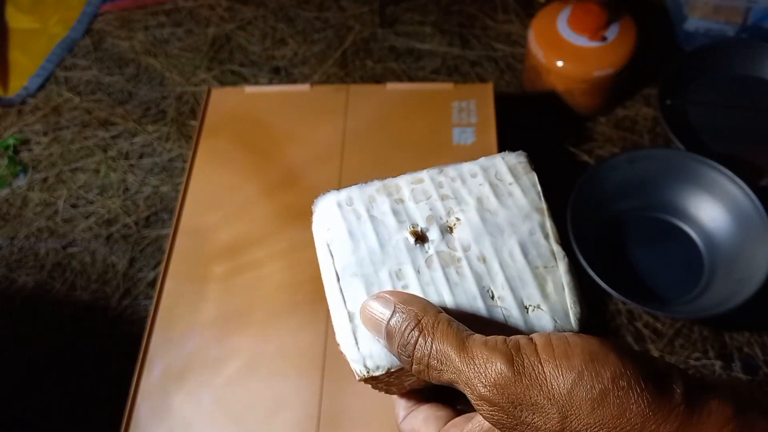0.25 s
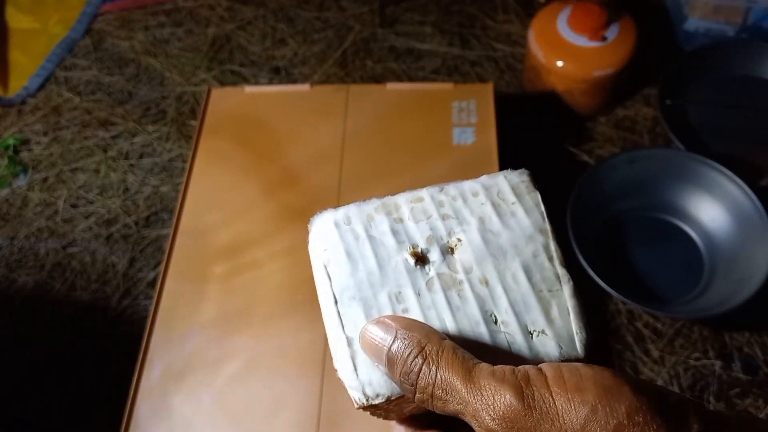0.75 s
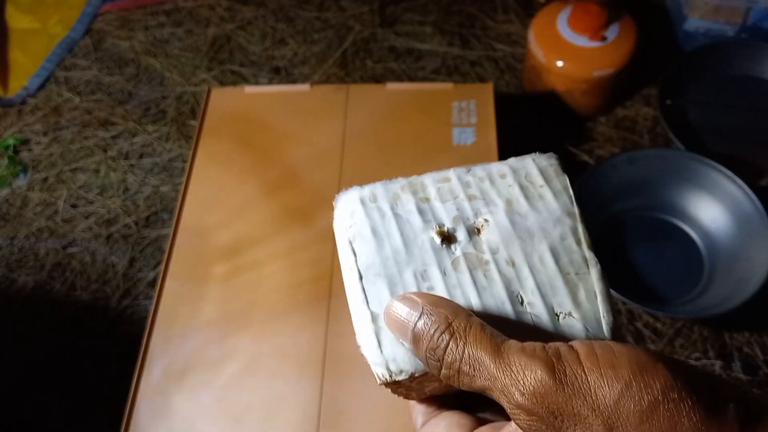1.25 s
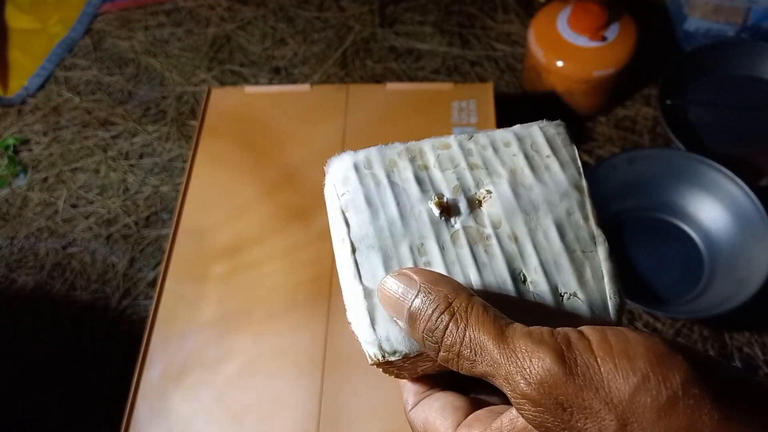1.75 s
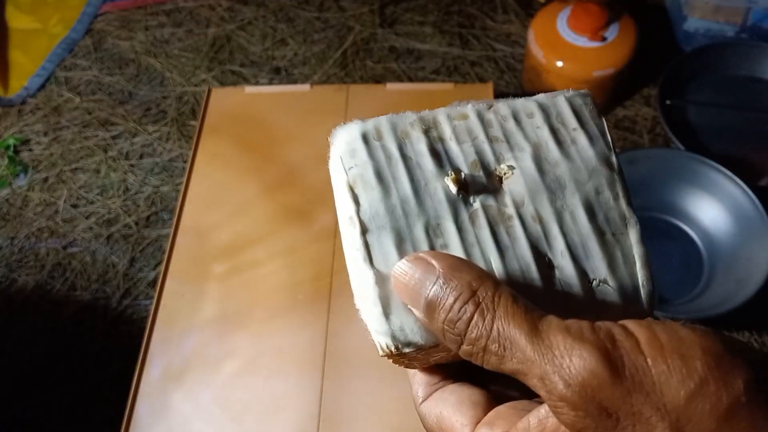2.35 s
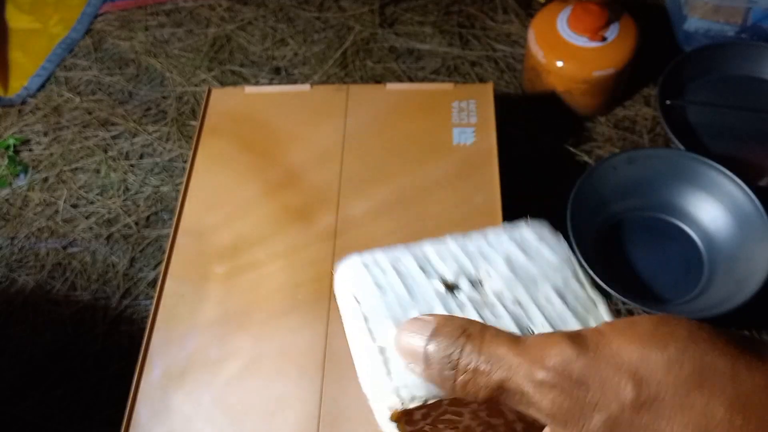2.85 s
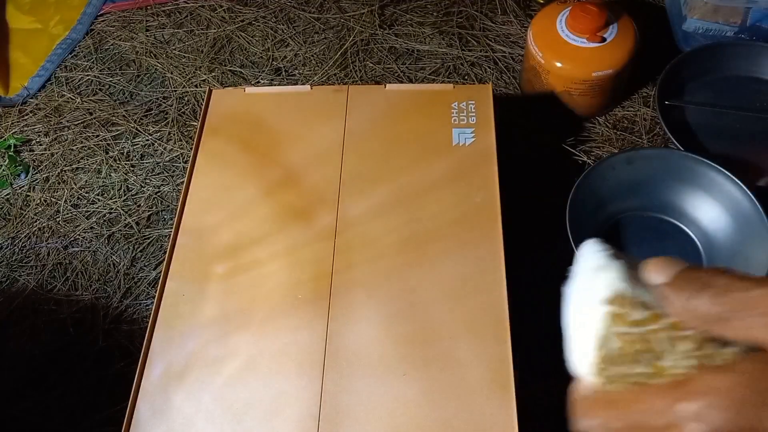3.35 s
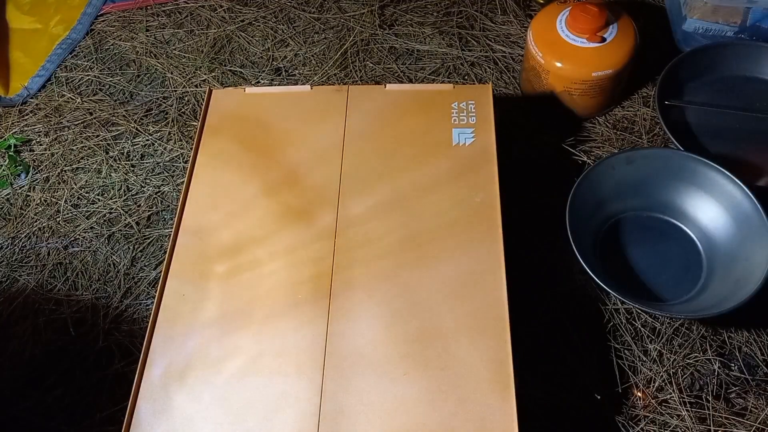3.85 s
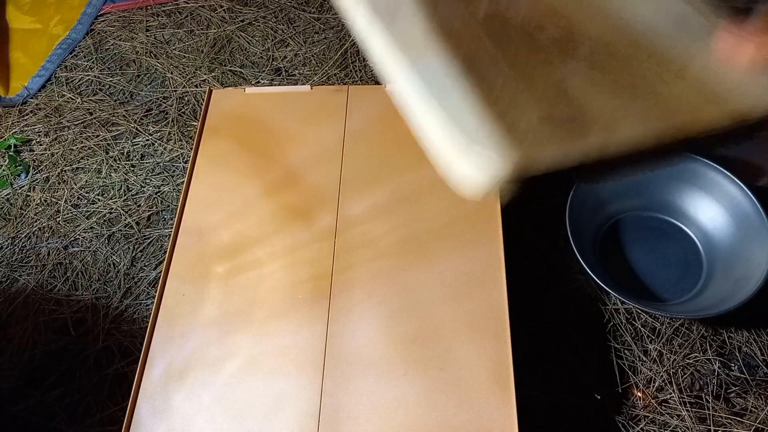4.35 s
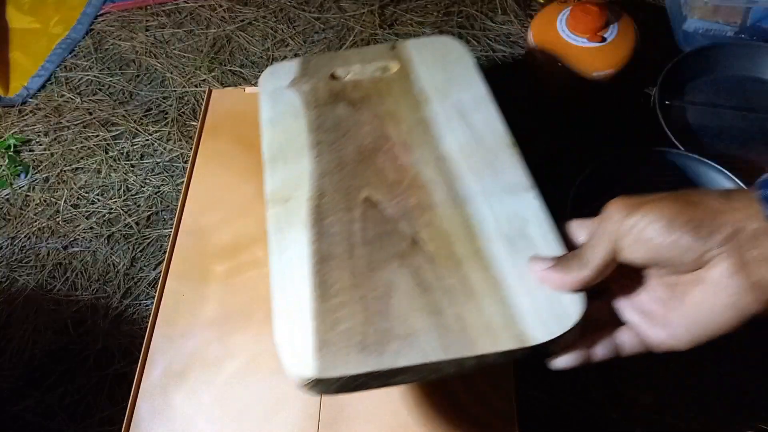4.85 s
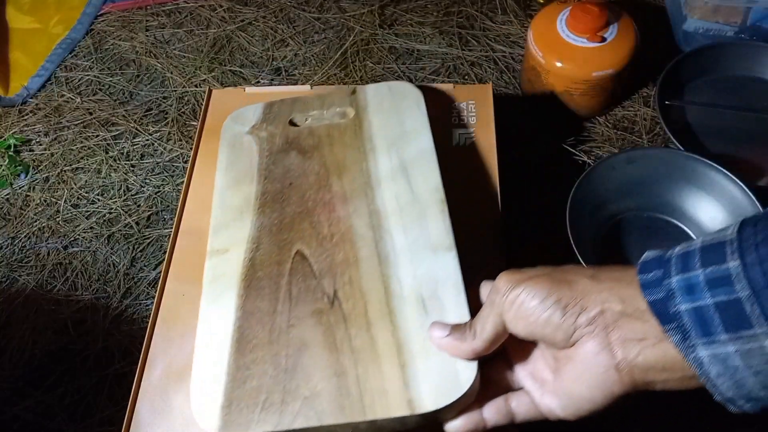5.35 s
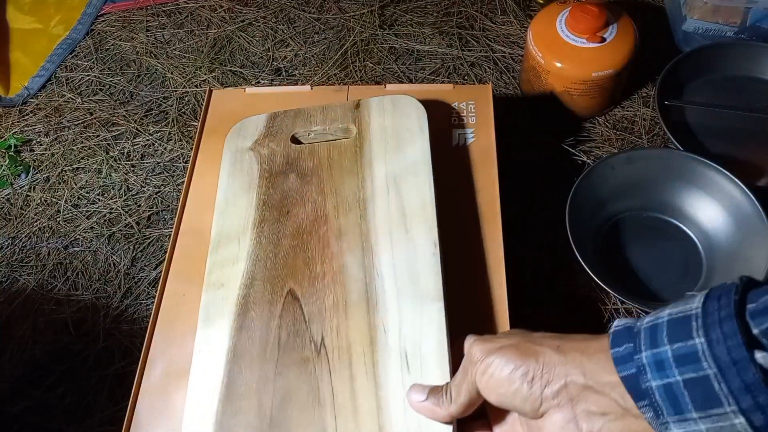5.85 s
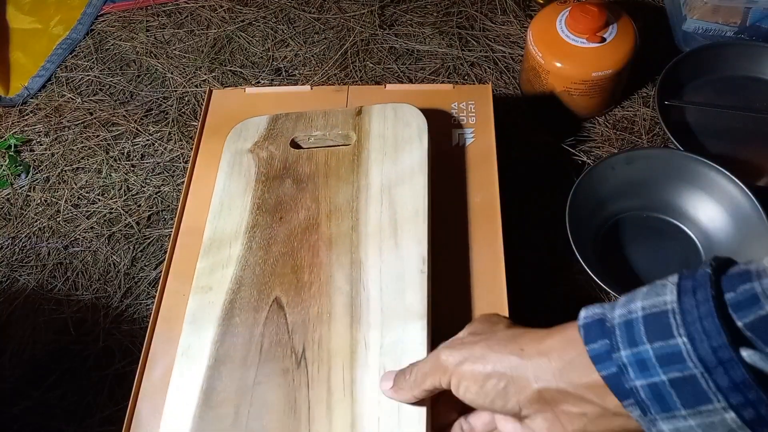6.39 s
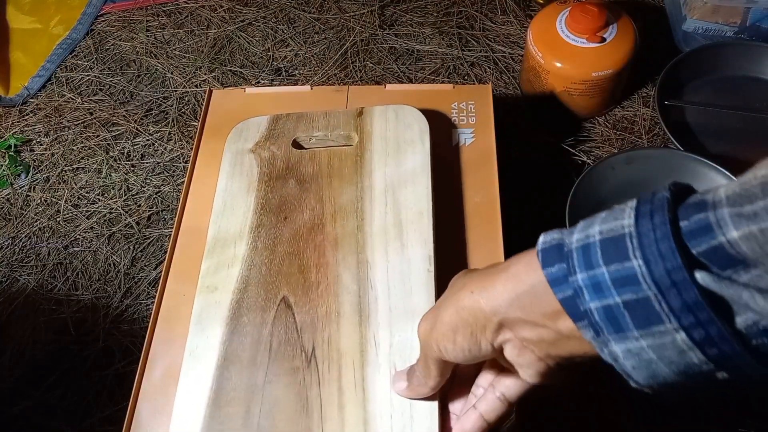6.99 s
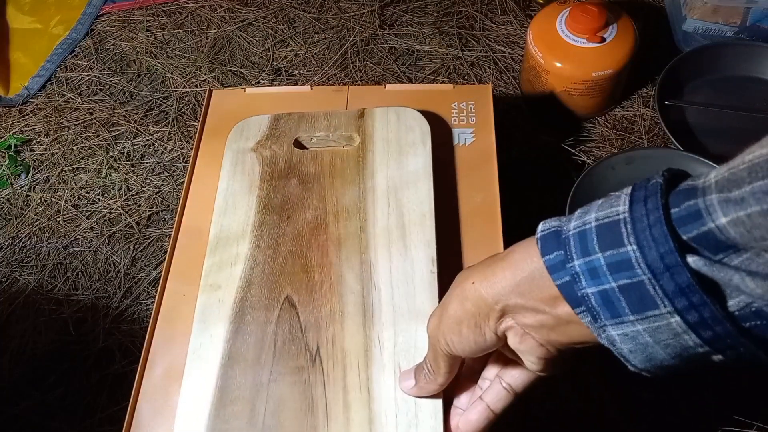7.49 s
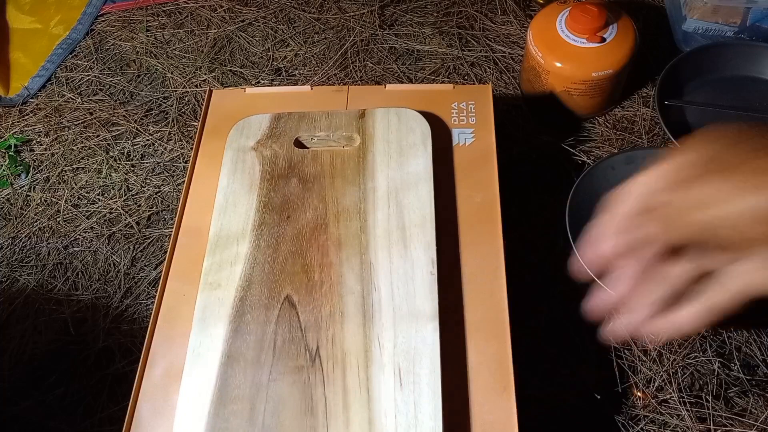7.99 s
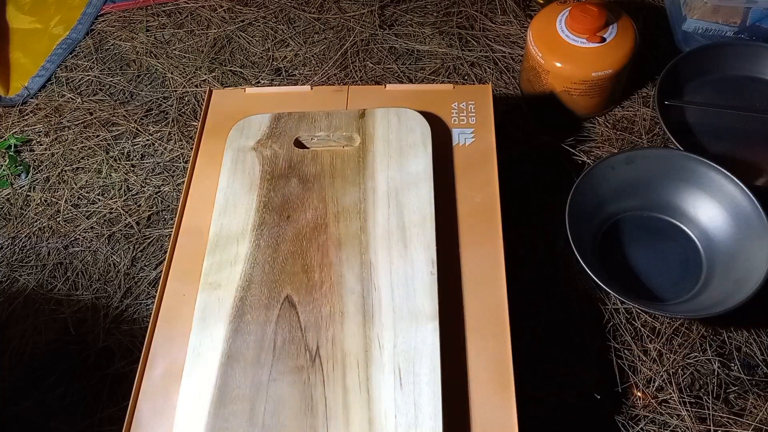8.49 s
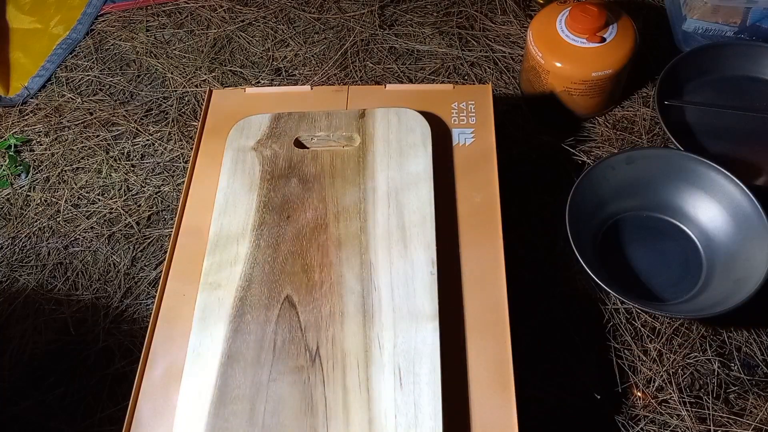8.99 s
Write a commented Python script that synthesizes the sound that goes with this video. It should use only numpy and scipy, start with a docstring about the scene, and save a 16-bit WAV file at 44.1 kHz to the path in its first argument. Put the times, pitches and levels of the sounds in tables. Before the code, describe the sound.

Crickets chirp throughout in a forest at night, a fast, very high trill alongside lower, slower chirps, over a steady low rumble. One nearer cricket stands out from about 0.7 to 1.7 seconds and again from 7 to 8. Close to the microphone, a metal pot is grazed at 0.3 seconds and clanks sharply at 0.6, ringing briefly. From 1 to 4 seconds, a block of food is turned in the hand with dull bumps and soft sleeve rustles, with another light pot touch at 1.8. A very faint, thin whistle rises and falls just after 4 seconds. A wooden board knocks onto a folding table at 5.4, clicks at 5.6 and clacks down louder at 6.3, with soft scrapes as it is nudged into place. Light rustles and a small metallic tick come between 8 and 8.5 seconds, and one more faint rustle at 9.

```python
"""Crickets, low-voiced and high-voiced, chirp at a forest camp at night by stridulation: a scraper
runs along a file and drives a wing resonance. Behind them lie a low rumble and a far insect chorus.
Close by, friction and soft impacts sound as sleeves move and a block of food is turned in the hand.
Struck metal cookware rings in damped modes, a faint whistle arches up and down, and a wooden board
clatters onto a folding table and slides. Ground and trunks scatter a short reverberant tail."""
import sys
import numpy as np
from scipy import signal
from scipy.fft import rfft, irfft, next_fast_len
from scipy.io import wavfile
from scipy.ndimage import map_coordinates

SR = 44100
rng = np.random.default_rng(int(sys.argv[2]) if len(sys.argv) > 2 else 0)


def materialize(psi):
    """Save the field psi as 16-bit PCM at rate SR to the path in sys.argv[1].

    A 1-D psi becomes a single channel; in a 2-D psi each row is a channel.
    """
    bounded = np.clip(np.atleast_2d(psi).T, -1, 1)
    quanta = np.round(bounded * 32767).astype(np.int16)
    wavfile.write(sys.argv[1], SR, quanta)


N = 407043


def amp(db):
    """Amplitude ratio of a level in decibels."""
    return 10 ** (np.asarray(db) / 20)


def unit(x):
    """Normalisation to rms 1."""
    return x / np.sqrt(np.mean(x ** 2) + 1e-20)


def clock(seconds):
    """Uniform sampling times over a duration."""
    return np.arange(int(seconds * SR)) / SR


def along(points, hz):
    """Interpolation of (f/Hz, value) points on a logarithmic frequency axis."""
    f, value = np.transpose(points)
    return np.interp(np.log(hz + 1), np.log(f + 1), value)


def wobble(rate):
    """Random modulation: a spline through Gaussian knots, rate of them a second."""
    knots = rng.standard_normal(int(N * rate / SR) + 4)
    return map_coordinates(knots, [np.arange(N) * rate / SR])


def filtered(x, response):
    """Linear filtering: the spectrum is multiplied by a frequency response."""
    n = x.shape[-1]
    padded = next_fast_len(n + 8192)
    return irfft(rfft(x, padded) * response(np.fft.rfftfreq(padded, 1 / SR)), padded)[..., :n]


def add(track, s, sound):
    """Superposition of a sound on a track, starting at time s."""
    i = max(round(s * SR), 0)
    part = track[..., i:i + sound.shape[-1]]
    part += sound[..., :part.shape[-1]]


def place(x, lead_ms, pan_db):
    """Localisation by time and level differences; positive values favour the left."""
    sides = np.array([[.5], [-.5]])
    return amp(sides * pan_db) * filtered(x, lambda hz: np.exp(2j * np.pi * hz * sides * lead_ms / 1000))


# left-right coherence of the sound field: f/Hz, coherence
COHERENCE = [(30, 0.57), (100, 1), (250, 0.86), (600, 0.19), (1500, 0), (4000, 0)]
def noise(spectrum, size=N):
    """Diffuse field: coloured stereo noise of rms 1, coherent in the bass, incoherent in the treble."""
    def response(hz):
        angle = np.arccos(np.clip(along(COHERENCE, hz), -1, 1)) / 2
        return amp(along(spectrum, hz)) * [np.cos(angle), np.sin(angle)]
    mid, side = filtered(rng.standard_normal((2, size)), response)
    return unit(np.array([mid + side, mid - side]))


# reverberation time among the trees: f/Hz, T60/s
FOREST_T60 = [(200, 0.14), (2000, 0.24), (6000, 0.33), (14000, 0.02)]
def scattered(x, wet_db):
    """Scattering by ground and trunks adds a short diffuse tail, which drifts with the air."""
    hz, t, spectra = signal.stft(rng.standard_normal((2, 2, SR // 3)), SR, nperseg=256)
    decay = amp(-60 * t / along(FOREST_T60, hz)[:, None])
    tails = signal.istft(spectra * decay, SR, nperseg=256)[1]
    tails /= np.linalg.norm(tails, axis=-1, keepdims=True)
    wet_a, wet_b = signal.fftconvolve(x[None], tails, axes=-1)[..., :N]
    drift = 2 * wobble(2)
    return x + amp(wet_db) * (wet_a * np.cos(drift) + wet_b * np.sin(drift))


# spectra of the distant rumble and of far insects and air: f/Hz, relative level/dB
RUMBLE_SPECTRUM = [(15, -58), (25, -31), (37, -35), (50, -20.5), (75, -5), (123, 1.5), (171, -6),
                   (238, -5.5), (275, -11.5), (501, -20), (591, -24.5), (1170, -32.5), (1380, -36.5),
                   (1500, -31), (3500, -50.5), (4550, -66), (7700, -120)]
CHORUS_SPECTRUM = [(2000, -20), (3000, -18), (3600, -20), (4300, -1.5), (4700, -9.5), (5100, -12),
                   (5800, -22.5), (6350, -7.5), (7600, -13.5), (8600, -7.5), (10300, -20.5), (13500, -17.5),
                   (16000, -16)]
def forest():
    """Incoherent summation: many distant insects blur into noise above a steady rumble."""
    rumble = amp(-51.5 + .28 * wobble(16)) * noise(RUMBLE_SPECTRUM)
    chorus = amp(-68.5 + 1.8 * wobble(42)) * noise(CHORUS_SPECTRUM)
    return place(rumble + chorus, lead_ms=0, pan_db=-.7)


def burst(spectrum, t60):
    """Impact transient: dense modes act as noise that falls 60 dB in t60 seconds."""
    t = clock(.5)
    attack = 1 - np.exp(-t / .0016)
    return noise(spectrum, size=len(t)) * amp(-60 * t / t60) * attack


def movement(s, length, rise_s, fall_s):
    """Friction envelope: speed grows exponentially up to time s, holds, then dies away."""
    t = np.arange(N) / SR
    return np.exp(np.minimum(t - s, 0) / rise_s - np.maximum(t - s - length, 0) / fall_s)


# dull bumps, bright snags of skin and cloth, dry ticks: t/s, level/dB
BUMPS = [(1.183, -32.5), (1.34, -45), (2.135, -46), (2.251, -35), (2.265, -56), (2.322, -44.5),
         (2.586, -43), (2.764, -36.5), (2.776, -43.5), (3.591, -37.5)]
SNAGS = [(.234, -65.5), (.446, -68), (.548, -52.5), (1.757, -42.5), (1.83, -49), (3.705, -54),
         (8.188, -53.5), (8.25, -50), (8.275, -53.5), (8.347, -47), (8.392, -53.5), (8.412, -54.5),
         (9.07, -55)]
TICKS = [(2.267, -48.5), (5.6235, -30.5), (5.628, -32), (8.343, -38.5)]
# hand and sleeve movements: t/s, duration/s, brush level/dB, rub level/dB, swish level/dB
GESTURES = [(0, 0.072, -58.5, -70, -67), (.15, 0.2, -67, -76, -86), (1.175, 0.16, -63, -68.5, -71),
            (1.386, 0.4, -71.5, -85, -83), (1.771, 0.095, -64.5, -62.5, -59.5),
            (2.147, 0.17, -57, -63.5, -62), (2.385, 0.31, -66, -72, -70.5),
            (2.81, 0.066, -69.5, -71.5, -70.5), (3.312, 0.12, -64.5, -86, -71),
            (3.42, 0.31, -62.5, -66, -65), (3.76, 0.28, -69.5, -73.5, -78), (8.085, 0.057, -59, -64, -54.5),
            (8.18, 0.086, -63.5, -62.5, -72), (8.403, 0.015, -57, -55.5, -63),
            (8.496, 0.047, -62, -58.5, -69), (9.071, 0.081, -65, -65.5, -88)]
# spectrum of each kind of contact: f/Hz, relative level/dB
BUMP_SPECTRUM = [(110, -43), (180, -2), (424, -3), (634, -5.5), (1020, -19.5), (1590, -72), (1700, -23),
                 (3090, -43), (4000, -23.5), (5200, -53), (8800, -120)]
TICK_SPECTRUM = [(290, -53), (500, 5.5), (758, -14), (1060, 0.5), (4440, -11.5), (5670, -24.5), (7340, -17),
                 (15500, -29)]
BRUSH_SPECTRUM = [(1500, -17.5), (3500, -1.5), (5800, -2.5), (8500, 0), (10000, -3), (13000, 2),
                  (16000, -11)]
RUB_SPECTRUM = [(300, -11), (650, 0), (1000, 7), (1300, -2), (1750, 5.5), (2200, -3), (6000, -35)]
SWISH_SPECTRUM = [(1000, -38), (1900, 0.5), (2700, 1), (3500, -5), (6000, -10.5)]
def handling():
    """Impact and stick-slip friction: fingers bump and rub the food, sleeves brush in tiny catches."""
    out = np.zeros((2, N))
    for contacts, spectrum, t60 in [(BUMPS, BUMP_SPECTRUM, .094), (SNAGS, BRUSH_SPECTRUM, .058),
                                    (TICKS, TICK_SPECTRUM, .026)]:
        for s, db in contacts:
            add(out, s, amp(db) * burst(spectrum, t60))
    catches = amp(2.2 * wobble(500) + wobble(60))
    brush = unit(noise(BRUSH_SPECTRUM) * catches)
    rub = unit(noise(RUB_SPECTRUM) * amp(1.8 * wobble(90)))
    swish = unit(noise(SWISH_SPECTRUM) * amp(4.8 * wobble(120)))
    # overlapping movements add in power
    power = sum(np.outer(amp(levels_db), movement(s, length, rise_s=.047, fall_s=.036)) ** 2
                for s, length, *levels_db in GESTURES)
    brush_gain, rub_gain, swish_gain = np.sqrt(power)
    out += brush_gain * brush + rub_gain * rub + swish_gain * swish
    return scattered(place(out, lead_ms=-.1, pan_db=-3), wet_db=-10)


def wing_stroke(centre_hz, glide_hz, length, third_db):
    """Stridulation: scraper on file makes a gliding tone that swells through the wing's resonance."""
    t = clock(length)
    progress = t / length
    # unevenly spaced teeth roughen pitch and level
    pitch_rough, level_rough = signal.resample(rng.standard_normal((2, 14)), len(t), axis=1)
    pitch = centre_hz * (1 + .011 * pitch_rough) + glide_hz * (progress - .5)
    phase = 2 * np.pi * np.cumsum(pitch) / SR
    swell = np.sin(np.pi * progress) / (1 + ((progress - .5) / .21) ** 2)
    return amp(1.3 * level_rough) * swell * (np.sin(phase) + amp(third_db) * np.sin(3 * phase))


# bouts of song: first chirp t/s, last chirp t/s, chirps, strokes per chirp, relative level/dB
HIGH_BOUTS = [(.055, .185, 2, 6, -1), (.335, .75, 5, 4, 0), (1.272, 2.135, 9, 4, -1),
              (2.25, 3.705, 14, 4, 0), (3.822, 4.018, 3, 3, 0), (4.65, 4.972, 4, 4, -1),
              (5.087, 5.72, 7, 4, 3), (5.856, 6.968, 11, 4, 0), (7.072, 7.862, 8, 5, .5),
              (7.962, 8.94, 10, 4, -.5), (9.07, 9.19, 2, 5, 0)]
def high_cricket(wing_hz=6916, stroke_s=.021, period_s=.018, level_db=-61):
    """Pulse modulation: quick rising wing strokes group into about nine chirps a second."""
    song = np.zeros(N)
    for first, last, chirps, strokes, db in HIGH_BOUTS:
        for start in np.linspace(first, last, chirps):
            for s in start + period_s * np.arange(strokes):
                stroke = wing_stroke(wing_hz, glide_hz=900, length=stroke_s, third_db=-70)
                add(song, s - stroke_s / 2, amp(level_db + db + rng.normal()) * stroke)
    return scattered(place(song, lead_ms=.03, pan_db=-2), wet_db=-8)


# the near cricket's two phrases: t/s, level/dB, strokes
NEAR_CHIRPS = [(0.689, -43.5, 3), (.934, -45.5, 3), (1.189, -46.5, 3), (1.432, -47, 2), (1.639, -44, 3),
               (6.88, -47.5, 3), (7.101, -46.5, 3), (7.349, -47, 3), (7.563, -47, 3), (7.807, -48.5, 2),
               (8.018, -46, 3)]
# its farther neighbour: first chirp t/s, last chirp t/s, chirps, relative level/dB
NEIGHBOUR_BOUTS = [(.09, .355, 2, 1.5), (1.9, 2.725, 4, -1), (3.117, 4.863, 8, 0), (5.14, 6.66, 7, -3),
                   (6.975, 9.182, 10, -.5)]
# far crickets, each at its own pace: f/Hz, chirp period/s, level/dB
FAR_CRICKETS = [(4550, .262, -71.5), (4260, 0.36, -69), (4420, 0.13, -79.5), (2910, 0.19, -82)]
def low_crickets(wing_hz=4563, stroke_s=.028, period_s=.034, neighbour_db=-61):
    """Chirps of two or three falling strokes; distance lowers the direct-to-reverberant ratio."""
    near, far = np.zeros((2, N))
    for start, db, strokes in NEAR_CHIRPS:
        for s in start + period_s * np.arange(strokes):
            stroke = wing_stroke(wing_hz, glide_hz=-1350, length=stroke_s, third_db=-21)
            add(near, s - stroke_s / 2, amp(db + .5 * rng.normal()) * stroke)
    three_strokes = period_s * np.arange(3)
    for first, last, chirps, db in NEIGHBOUR_BOUTS:
        for start in np.linspace(first, last, chirps):
            for s in start + three_strokes:
                stroke = wing_stroke(wing_hz, glide_hz=-900, length=stroke_s, third_db=-21)
                add(far, s - stroke_s / 2, amp(neighbour_db + db + rng.normal()) * stroke)
    for hz, chirp_period, db in FAR_CRICKETS:
        for start in np.arange(rng.uniform(0, chirp_period), N / SR, chirp_period):
            for s in start + .015 * rng.normal() + three_strokes:
                stroke = wing_stroke(hz, glide_hz=-600, length=stroke_s, third_db=-40)
                add(far, s, amp(db + 2 * rng.normal()) * stroke)
    ground_echo = amp(-12) * np.roll(near, round(.0035 * SR))  # beats against each falling stroke
    near = scattered(place(near + ground_echo, lead_ms=.04, pan_db=-1.5), wet_db=-8)
    far = scattered(place(far, lead_ms=.02, pan_db=-1), wet_db=-5)
    return near + far


RING_S = .7
def ring(modes):
    """Free vibration: a sum of damped modes, with random phases and slightly varied strengths."""
    t = clock(RING_S)
    tone = np.zeros(len(t))
    for hz, db, t60 in modes:
        envelope = amp(db + rng.uniform(5, 7) - 60 * t / t60)
        tone += envelope * np.sin(2 * np.pi * (hz * t + rng.random()))
    attack = 1 - np.exp(-t / .0006)
    # the ring carries little bass below about 250 Hz
    return filtered(tone * attack, lambda hz: hz ** 3 / (hz ** 3 + 250 ** 3))


# modes of the pot's thin rim: f/Hz, relative level/dB, T60/s
RIM_MODES = [(915, 17, .12), (925, 1, .6), (1075, -4, .6), (1192, 19, .14), (1836, 3, .55), (2600, 0, .42),
             (2853, -8, .42), (3004, -3, .42), (3045, -4, .42), (3332, -6, .42), (3472, -1, .42),
             (4185, -5, .42), (4490, -5, .42), (5125, -11, .42), (5539, -1, .42), (6315, -6, .42),
             (6490, -11, .42), (7822, -8, .42), (8000, -8, .42), (8328, -8, .42), (8678, -6, .42),
             (8985, -11, .42), (11220, -6, .42), (11350, -11, .42), (12400, -7, .42), (12590, -6, .42)]
def rim(shimmer_db=-13, in_phase_db=-5):
    """Dipole radiation: the rim flexes to and fro, so left and right are mostly in opposite phase."""
    def flex():
        weak_modes = [(hz, shimmer_db, t60) for hz, t60 in rng.uniform([2500, .3], [15100, .55], (80, 2))]
        return ring(RIM_MODES) + ring(weak_modes)
    in_phase, opposed = amp(in_phase_db) * flex(), flex()
    return np.array([in_phase + opposed, in_phase - opposed])


# cookware contacts: t/s, wall level/dB, clash level/dB, hardness (0-1)
CLANKS = [(.287, -47.5, -75, 0.16), (0.318, -40, -50, 0.11), (.335, -52, -65, 0.25),
          (.6452, -27, -13, 0.78), (0.6497, -34, -17.5, 0.33), (1.756, -35.5, -55, 0.18),
          (8.343, -64, -49, 0.95), (8.406, -48, -79, 0.06)]
# damped modes of the pot's wall and base: f/Hz, relative level/dB, T60/s
POT_MODES = [(566, -5, 0.13), (974, 4, 0.08), (1520, -20.5, 0.032), (1668, 5.5, 0.054), (1720, -5, 0.065),
             (1994, -1.5, 0.097), (2700, -12, 0.092), (3854, 5, 0.037), (5130, 1, 0.021)]
# spectrum of the metallic clash: f/Hz, relative level/dB
CLASH_SPECTRUM = [(300, -20.5), (560, -13.5), (950, -10), (1300, -3), (1700, 14), (2350, -8.5), (2700, 4.5),
                  (3300, -9), (3850, 0), (5200, -1), (6000, -8), (15500, -55)]
def cookware(graze_hz=1014, rim_db=-14.5):
    """Impact excitation: harder contacts drive a wider band of wall modes and ring the rim more."""
    wall, bright = np.zeros(N), np.zeros((2, N))
    choked_rim = rim() * np.exp(-(clock(RING_S) / .3) ** 3)  # the hand damps it
    for s, wall_db, clash_db, hardness in CLANKS:
        half_width_hz = 200 + 7000 * hardness ** 2
        tone = filtered(ring(POT_MODES), lambda hz: 1 / (1 + ((hz - graze_hz) / half_width_hz) ** 2))
        # a grazing touch builds up slowly and chatters
        graze = np.clip(1 - 2 * hardness, 0, 1)
        attack = 1 - np.exp(-clock(RING_S) / (.0002 + .008 * graze))
        chatter = amp(5 * graze * wobble(250)[:len(tone)] - 3 * graze)
        add(wall, s, amp(wall_db) * tone * chatter * attack)
        add(bright, s, amp(wall_db + rim_db) * hardness ** 2 * choked_rim)
        add(bright, s, amp(clash_db) * burst(CLASH_SPECTRUM, t60=.029))
    direct = place(wall, lead_ms=-.2, pan_db=-2) + place(bright, lead_ms=0, pan_db=-2.5)
    return scattered(direct, wet_db=-14)


# arch of the whistle's unsounded fundamental: t/s, f/Hz
WHISTLE_ARCH = [(4.02, 1540), (4.06, 1720), (4.11, 1920), (4.21, 2080), (4.25, 1980), (4.3, 1990),
                (4.325, 1830), (4.355, 1520)]
def whistle(resonance_hz=12500, half_width_hz=1800, fade_s=.025):
    """Resonance: two flickering harmonics glide up and down, swelling as they near its peak."""
    t = np.arange(N) / SR
    times, hz = np.transpose(WHISTLE_ARCH)
    pitch = np.interp(t, times, hz)
    fade = np.clip(np.minimum(t - times[0], times[-1] - t) / fade_s, 0, 1)
    phase = 2 * np.pi * np.cumsum(pitch * (1 + .0036 * wobble(200))) / SR
    resonance = lambda f: 1 / (1 + ((f - resonance_hz) / half_width_hz) ** 2)
    partials = sum(resonance(k * pitch) * amp(4.5 * wobble(35)) * np.sin(k * phase) for k in (6, 7))
    return place(amp(-72) * fade * partials, lead_ms=0, pan_db=-2)


# the board meets the table: t/s, ring level/dB, clatter level/dB, half the low-pass cutoff f/Hz
BOARD_HITS = [(5.404, -31, -43, 664), (5.411, -47, -45, 646), (5.448, -39, -45.5, 650),
              (6.2609, -37.5, -23.5, 2200), (6.286, -56, -47, 1180)]
# it is nudged into place: t/s, duration/s, level/dB
NUDGES = [(5.632, 0.15, -54.5), (6.443, 0.11, -58.5), (6.979, 0.017, -59), (7.704, .015, -63)]
# modes of the board on the table top: f/Hz, relative level/dB, T60/s
BOARD_MODES = [(426, -24.5, 1), (479, -6.5, 0.14), (493.6, -4, 0.23), (636, -11, 0.074), (697, -18, 0.16),
               (924, -13, 0.26), (1040, -19, 0.22), (1136, -24, 0.21), (1292, -17.5, 0.29),
               (1720, -28.5, 0.25)]
# spectra of wood striking and sliding: f/Hz, relative level/dB
CLATTER_SPECTRUM = [(150, -42), (280, -27), (455, -5), (764, 0.5), (870, -3.5), (1440, -2.5), (1750, -9),
                    (2050, -8), (2930, -19), (3230, -23), (12000, -43.5), (15600, -81), (22000, -120)]
SCRAPE_SPECTRUM = [(300, -40), (490, 19), (700, -10), (980, 6), (1500, 0.5), (2600, -4), (3500, -13.5),
                   (9000, -45)]
def board():
    """Free and forced vibration: the board lands on edge, then flat; sliding keeps its modes humming."""
    tone, clatter = np.zeros(N), np.zeros((2, N))
    for s, ring_db, clatter_db, bright_hz in BOARD_HITS:
        add(tone, s, amp(ring_db) * ring(BOARD_MODES))
        clack = filtered(burst(CLATTER_SPECTRUM, t60=.12), lambda hz: 1 / np.hypot(1, hz / (2 * bright_hz)))
        add(clatter, s, amp(clatter_db) * clack)
    driven_modes = signal.fftconvolve(rng.standard_normal(N), ring(BOARD_MODES))
    hum = unit(np.diff(driven_modes)[:N])
    speed = sum(amp(db) * movement(s, length, rise_s=.04, fall_s=.034) for s, length, db in NUDGES)
    sliding = speed * amp(.8 * wobble(70)) * (amp(-1) * noise(SCRAPE_SPECTRUM) + amp(-6.5) * hum)
    return scattered(place(tone + clatter + sliding, lead_ms=.18, pan_db=2.5), wet_db=-15)


def scene():
    """Superposition: the pressures of all sources add at the table."""
    return forest() + handling() + high_cricket() + low_crickets() + cookware() + whistle() + board()


def record(dry):
    """Band limiting: an ideal low-pass filter removes the highest treble."""
    return filtered(dry, lambda hz: hz < 15850)


dry = scene()
out = record(dry)
materialize(out)
```